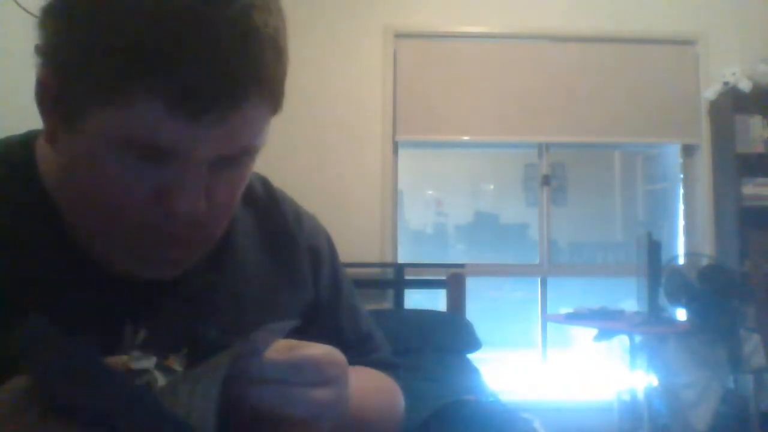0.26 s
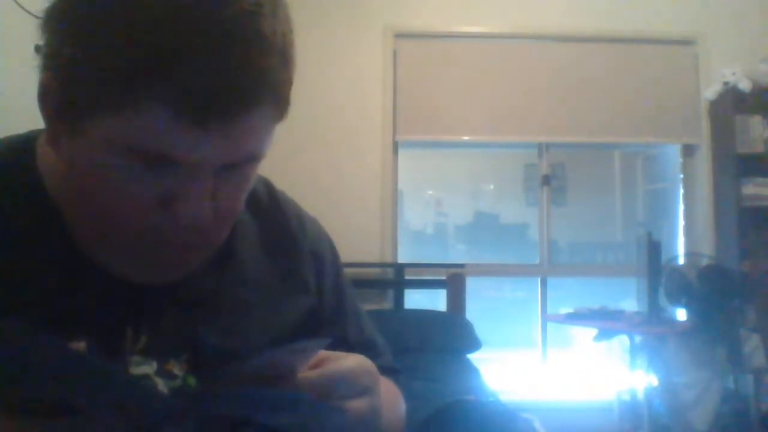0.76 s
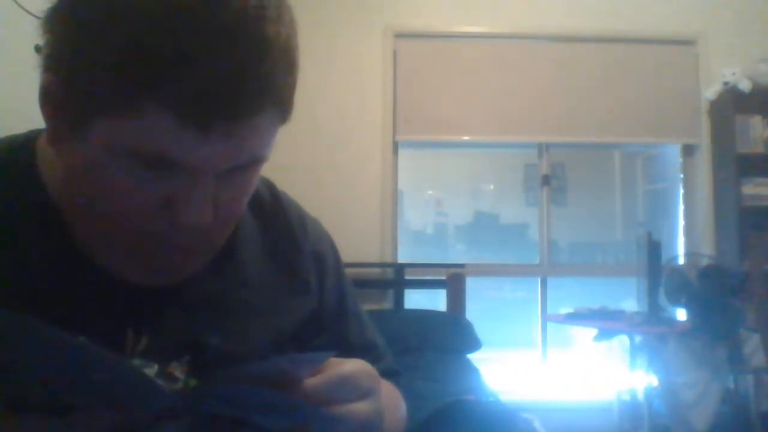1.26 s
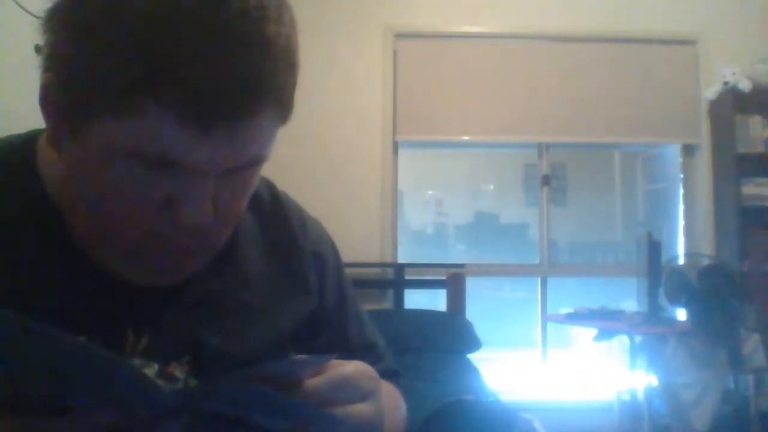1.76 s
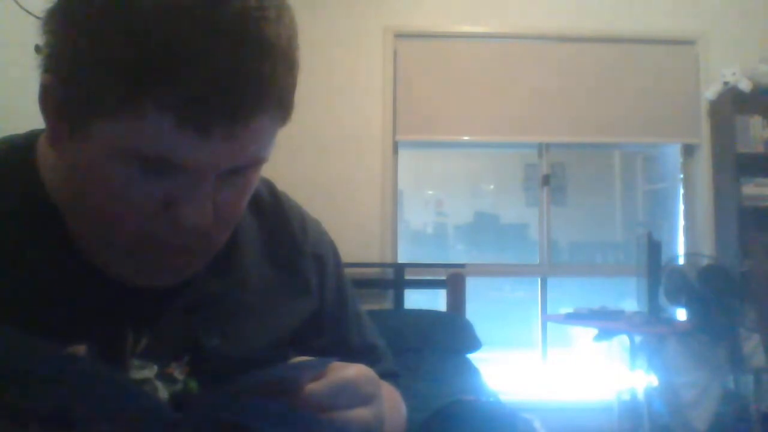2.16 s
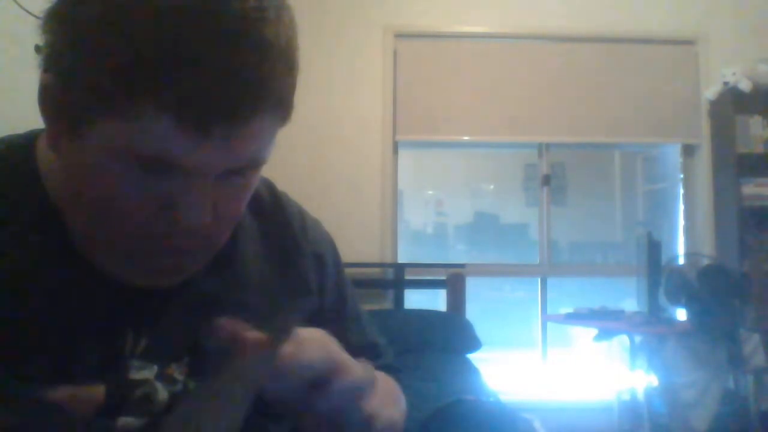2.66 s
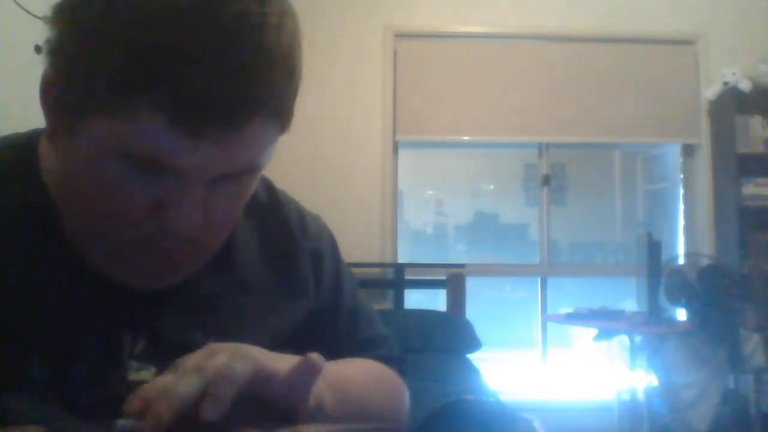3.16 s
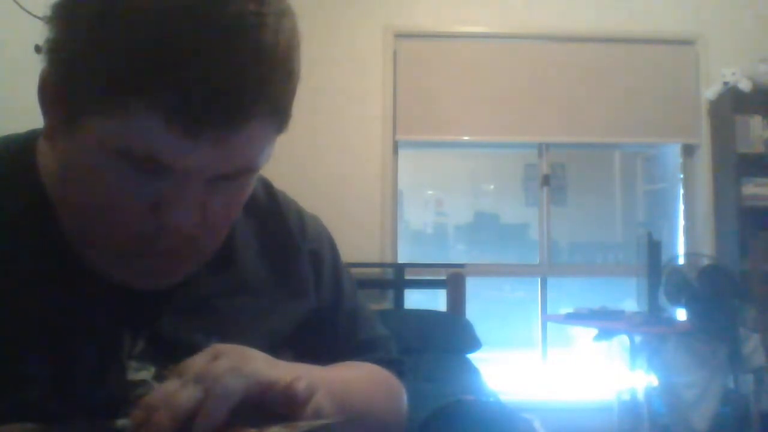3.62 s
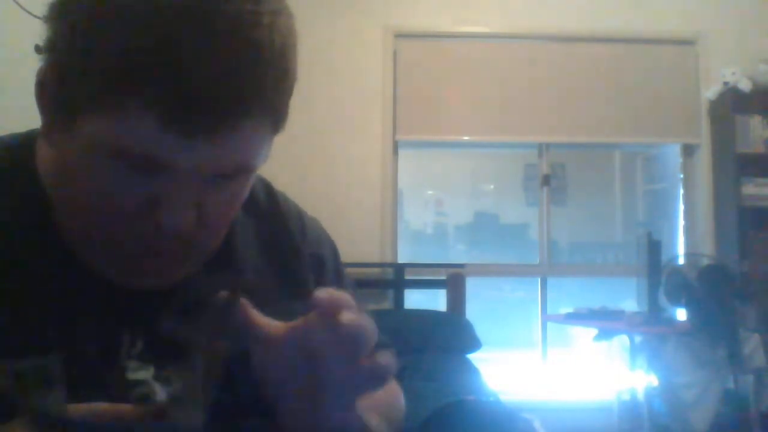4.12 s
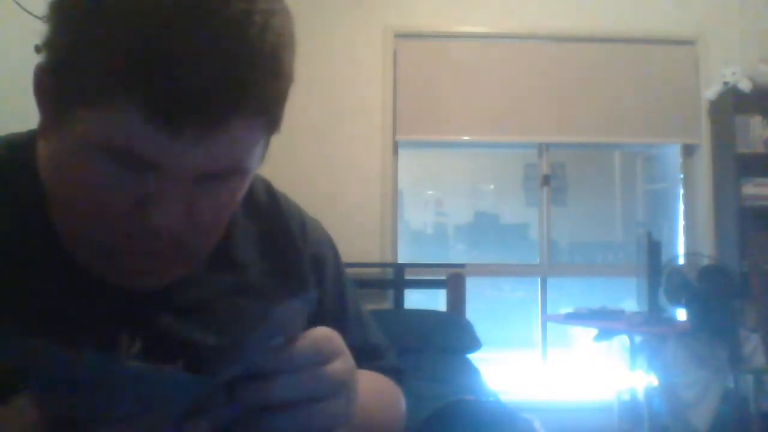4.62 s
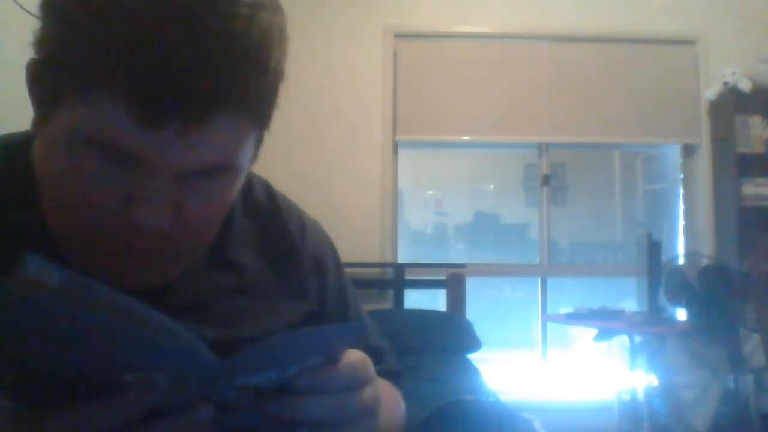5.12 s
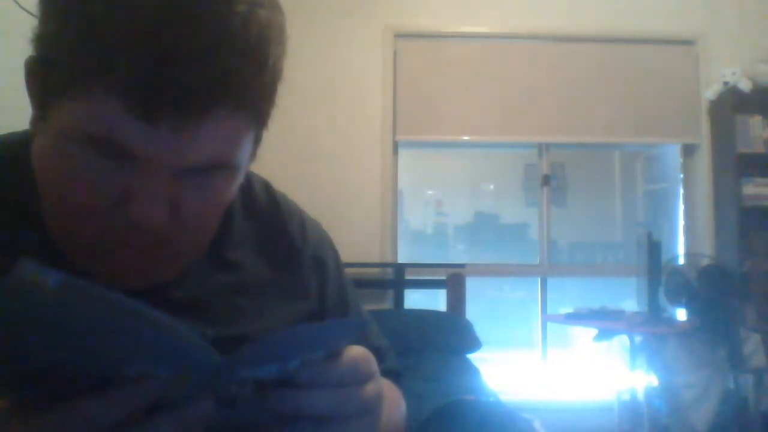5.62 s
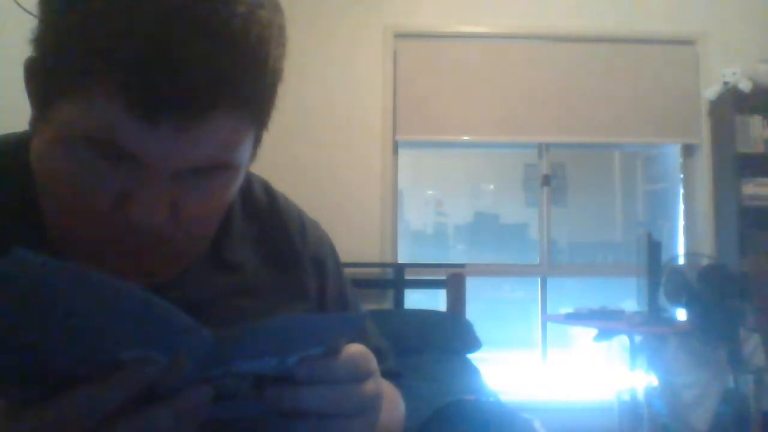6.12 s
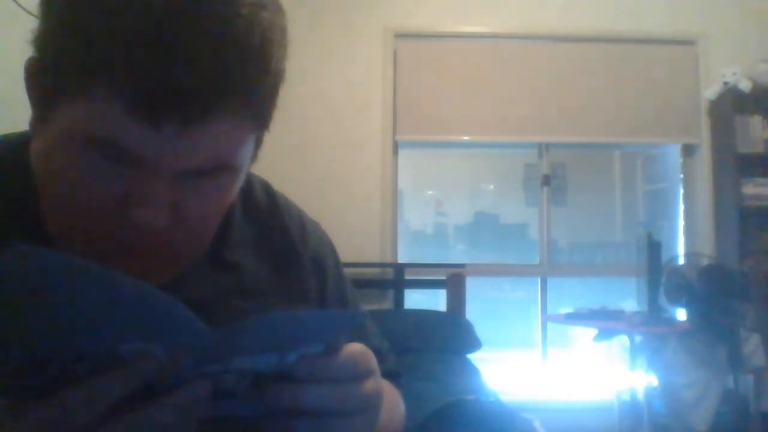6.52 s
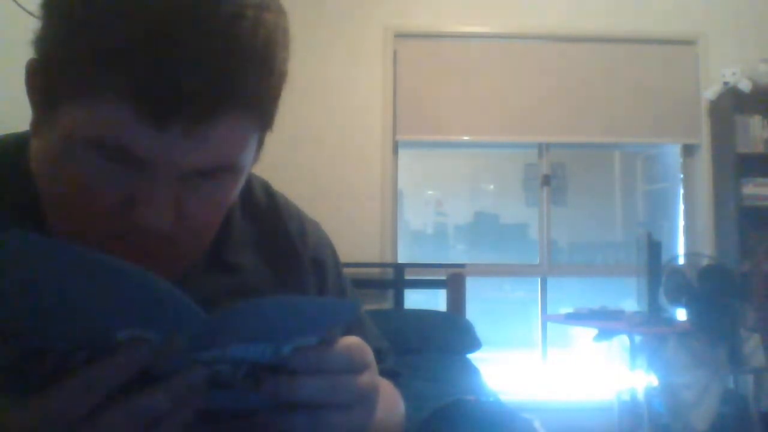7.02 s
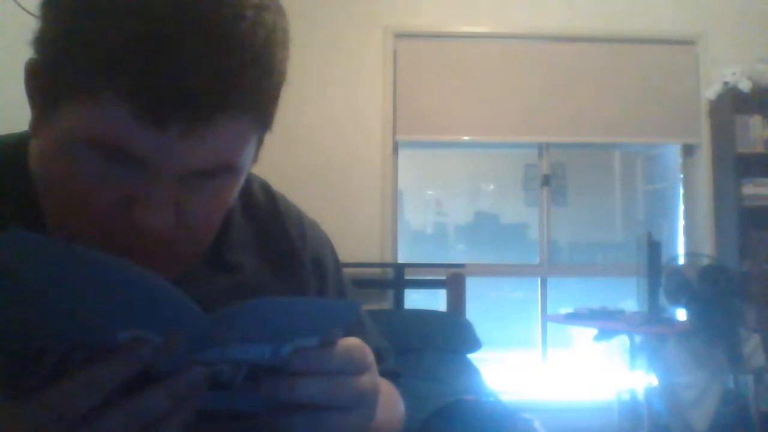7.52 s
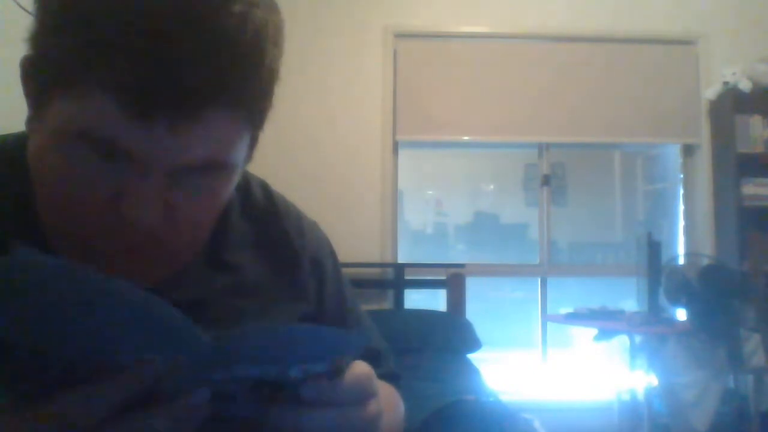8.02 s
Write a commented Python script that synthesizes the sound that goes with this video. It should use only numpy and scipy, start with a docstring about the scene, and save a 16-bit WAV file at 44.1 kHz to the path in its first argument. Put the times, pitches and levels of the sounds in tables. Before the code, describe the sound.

A small cooling fan hums right at the microphone in a quiet room, with a soft rush of air and a fast, fine rattle from its worn bearing. It stumbles briefly now and then. Under it a low tone throbs evenly, and electronics whine faintly very high up. Paper is handled softly, mostly around the middle, with a few dull bumps. A far engine drones faintly through the walls.

```python
"""A small cooling fan with a worn bearing, close to the microphone in a quiet room. It hums on the
harmonics of its turning, rushes through its duct, ticks once a turn and stumbles now and then.
Under it two low machine tones beat into a slow throb; the electronics whine and buzz very high up.
Paper is handled softly, with a few dull bumps. Far off outside, an engine drones through the walls
and changes speed."""
import sys
import numpy as np
from scipy import signal
from scipy.fft import rfft, irfft
from scipy.io import wavfile
from scipy.ndimage import map_coordinates

SR = 44100
rng = np.random.default_rng(int(sys.argv[2]) if len(sys.argv) > 2 else 0)


def dump(signal):
    """Clip the signal to [-1, 1] and save it as 16-bit WAV at the path in sys.argv[1]."""
    limited = np.clip(np.atleast_2d(signal).T, -1, 1)
    pcm = np.round(limited * 32767).astype(np.int16)
    wavfile.write(sys.argv[1], SR, pcm)


N = 365148
T = np.arange(N) / SR

# the fan at the microphone: (time [s], speed [turns/s])
FAN_SPEED = [(0, 59.48), (1.1, 59.75), (2.5, 59.58), (3.2, 59.73), (4.9, 59.47), (5.7, 59.69), (6.4, 59.55),
             (8.28, 59.75)]
# its hum, and the bearing's thin overtones: (harmonic [multiple of turn rate], relative level [dB])
FAN_HARMONICS = [(1, -9), (2, -18.5), (3, -23.5), (4, -18.5), (5, -17.5), (6, 0), (7, -12.5), (8, -14),
                 (9, -11), (10, -20), (11, -32), (12, -15), (13, -17.5), (14, -20.5), (15, -16), (16, -18),
                 (17, -28), (18, -23.5), (19, -26), (20, -28.5)]
BEARING_HARMONICS = [(32, -23.5), (35, -27.5), (38, -27.5), (43, -28)]
# the rotor stumbles: (time [s], half length [s], depth [0-1])
STUMBLES = [(0.666, 0.04, 0.7), (1.148, 0.049, 0.65), (1.95, 0.085, 0.47), (2.753, 0.045, 0.77),
            (3.524, 0.042, 0.77), (4.947, 0.053, 0.68), (5.603, 0.057, 0.8), (7.005, 0.06, 0.72)]
# the bearing settles or rattles hard: (start [s], end [s], looseness [0 calm, 1 its usual rattle])
BEARING_SPELLS = [(.09, .25, .4), (0.717, 1.018, 0.16), (1.022, 1.66, 0.63), (1.66, 1.9, 2),
                  (2.07, 2.57, .15), (2.567, 2.83, 2.1), (3.62, 3.84, 0.16), (4.14, 4.8, 1.4),
                  (5.02, 5.39, .15), (6.33, 6.68, .45), (7.1, 7.337, 0.24), (7.434, 7.577, 0.55),
                  (7.96, 8.2, 1.8)]
# spectrum of one bearing tick: (frequency [Hz], gain [dB])
TICK_SPECTRUM = [(500, -8), (720, -24), (880, -5), (1150, -12), (1720, -6), (1930, 3), (2550, 3.5),
                 (3100, -2), (3570, -13.5), (3750, -24.5), (4150, -3), (4550, -24), (7000, -31.5)]
# its echoes inside the case: (delay [s], gain [dB])
CASE_ECHOES = [(.00313, -4), (.0042, -10), (.00626, -10)]
# rush of air and microphone hiss: (frequency [Hz], level [dB per Hz])
AIR_SPECTRUM = [(8, -102), (20, -82), (140, -81), (230, -85), (505, -90.5), (700, -84), (1080, -84),
                (1750, -91.5), (2200, -91.5), (3400, -94.5), (4500, -110), (10300, -110), (13300, -105),
                (15500, -109)]
# resonances of the air duct: (frequency [Hz], width [Hz], level [dB per Hz])
DUCT_RESONANCES = [(362.6, 51, -73), (447, 35, -79.5), (580.4, 66, -79), (875, 113, -78),
                   (1409, 150, -84.5), (2573, 74, -88)]
# two steady machine tones in the room: (frequency [Hz]) and (level [dB rms])
THROB_HZ = [86.671, 90.132]
THROB_DB = [-47.5, -48]
# spectrum of one burst of the screen's buzz: (frequency [Hz], gain [dB])
BUZZ_SPECTRUM = [(9500, -50), (11100, -10), (11500, -12.5), (11800, -6), (12300, -25), (12950, -6),
                 (13250, -7), (13500, 5), (13950, -6), (14250, -14), (15000, -28), (15500, -35)]
# coil whistles: (frequency [Hz]) and (level [dB rms])
WHINE_HZ = [4848, 7600, 11152, 12608.5, 12848, 14305]
WHINE_DB = [-88.5, -99, -73, -71.5, -71.5, -83]
# paper crinkles: (time [s], peak level before the cut [dB rms], decay [s], cut of the body [dB])
CRINKLES = [(.648, -54, 0.014, 3), (2.53, -52, .024, 10), (2.709, -61, .015, 9), (3.065, -54, .028, 12),
            (3.874, -55.5, .01, 3), (3.91, -61, .022, 2), (4.316, -48, .009, 5), (4.36, -60, .025, 8),
            (4.569, -59, .008, 11), (4.68, -58.5, .008, 7), (4.8, -59.5, 0.034, 5)]
# spectrum of the paper: (frequency [Hz], gain [dB])
PAPER_SPECTRUM = [(800, -10), (2800, 10), (6000, 3), (12000, -3), (16000, 0)]
# dull bumps in the room: (time [s], peak level [dB rms])
BUMPS = [(.84, -52), (2.14, -50), (2.75, -52), (3.2, -59), (3.53, -51), (4.96, -46.5), (6.25, -48.5),
         (7.28, -53), (7.62, -52)]
# the far engine outside: (start [s], end [s], start pitch [Hz], end pitch [Hz], level [dB rms])
ENGINE_SWELLS = [(-.1, .33, 62.3, 65.2, -46), (.5, .85, 75, 78, -61), (2.45, 3.0, 78, 77, -60),
                 (3.6, 4.29, 44.3, 46.7, -47), (4.52, 4.72, 52, 57, -51), (4.92, 5.08, 75, 81, -60)]


def fan_hum(turns, stumble, looseness, hum_db=-42.0, shake_turns=0.014, waver_turns=0.0019, waver_db=0.1):
    """Close up, harmonics of the turn rate. A stumble shakes them all and chops all but the lowest two."""
    shaken = turns + (shake_turns * stumble + waver_turns * looseness) * drift(60)
    harmonics = [tone(round(k) * shaken + rng.random(), db)
                 for k, db in list(FAN_HARMONICS) + list(BEARING_HARMONICS)]
    chop = 1 - stumble * (1.03 + 0.49 * np.cos(np.pi * turns + drift(15)))   # on every other turn
    waver = from_db(waver_db * looseness * drift(30))
    return from_db(hum_db) * (sum(harmonics[:2]) + sum(harmonics[2:]) * chop * waver)


def fan_flutter(turns, stumble, whirl_db=-40, growl_db=-48, whirl_hz=385, rise_hz=120):
    """The stumbling rotor whirls at half speed: a rising chirp every other turn, in a broader growl."""
    lap = (turns / 2) % 1
    cycles = np.cumsum(whirl_hz + rise_hz * (lap - .5)) / SR + 0.12 * drift(35)
    whirl = np.sin(np.pi * lap) * tone(cycles, whirl_db)
    growl = from_db(growl_db) * rms_one(resonant_noise(hz=398, width_hz=245))
    return stumble * (whirl + growl)


def bearing_looseness(settle_s=0.028):
    """Play in the worn bearing: 1, except in the spells where it calms down or rattles hard."""
    change = sum((looseness - 1) * spell(start, end, settle_s) for start, end, looseness in BEARING_SPELLS)
    return np.maximum(1 + change, 0)


def bearing_ticks(turns, looseness, tick_db=-25.5, jitter_s=.00007, scrape_db=-17, scrape_s=0.0012):
    """One contact a turn echoes in the case and scrapes on briefly; a loose bearing makes it limp."""
    contact_turns = np.arange(int(turns[-1])) + .245
    times = np.interp(contact_turns, turns, T)
    force = from_db(contact_db(np.interp(times, T, looseness)))
    times = times + jitter_s * rng.standard_normal(len(times))
    echoes = sum(clicks(times + delay, force * from_db(db)) for delay, db in CASE_ECHOES)
    knocks = clicks(times, force) + echoes
    tails = signal.lfilter([1], [1, -np.exp(-1 / (scrape_s * SR))], knocks + 1e-18)
    scrape = from_db(scrape_db) * tails * rng.standard_normal(N)
    ticks = from_db(tick_db) * colour(knocks + scrape, TICK_SPECTRUM)
    return ticks + bearing_squeaks(times, np.minimum(force, 1.15))


def contact_db(looseness, hard_db=6, spread_db=2.2, hardest_db=7, rebound=2.1, scatter_db=3.9):
    """Each contact against an ordinary tick. A hard knock throws the shaft clear, so the next is weak."""
    count = len(looseness)
    gaps = np.where(rng.random(count) < .5, 3, 2)   # a hard knock every second or third turn
    hard = np.isin(np.arange(count), np.cumsum(gaps) - gaps[0])
    knock_chance, tick_chance = rng.standard_normal((count, 2)).T
    knock_db = hard * np.clip(looseness * (hard_db + spread_db * knock_chance), 0, hardest_db)
    previous_knock_db = np.append(0, knock_db[:-1])
    return knock_db - rebound * previous_knock_db + scatter_db * tick_chance * ~hard


def bearing_squeaks(times, force, squeak_db=-53.0, ring_s=0.0016, pitch_hz=3400, spread_hz=130, fall_hz=110):
    """Each contact squeaks for a few milliseconds at a new pitch, sinking as the shaft lets go."""
    age = np.arange(800) / SR
    swell = (age / ring_s) ** 2 * np.exp(2 - 2 * age / ring_s)
    start_hz = pitch_hz + spread_hz * rng.uniform(-2.24, 1.72, (len(times), 1))
    hz = start_hz - fall_hz * age / ring_s
    squeaks = force[:, None] * swell * tone(np.cumsum(hz, axis=1) / SR, squeak_db)
    at = (times * SR).astype(int)[:, None] + np.arange(len(age))
    return np.bincount(at.ravel(), squeaks.ravel(), N)[:N]


def air_rush():
    """The fan's smooth rush, raised at the resonances of its duct, with microphone hiss on top."""
    duct = sum(from_db(db) * resonant_noise(hz, width) for hz, width, db in DUCT_RESONANCES)
    return np.sqrt(SR / 2) * (colour(rng.standard_normal(N), AIR_SPECTRUM) + duct)


def machine_throb(crest_s=.066):
    """In the room, two low tones close in pitch swell and cancel three and a half times a second."""
    return sum(tone(hz * (T - crest_s), db) for hz, db in zip(THROB_HZ, THROB_DB))


def electronics(refresh_hz=59.763, first_s=.0136, buzz_db=-24.0, waver_db=1.5, jitter_s=.0000025):
    """A short bright burst at each screen refresh, and thin coil whistles that pulse in step."""
    times = np.arange(first_s, T[-1], 1 / refresh_hz)
    times = times + jitter_s * rng.standard_normal(len(times))
    buzz = from_db(buzz_db) * colour(clicks(times, np.ones(len(times))), BUZZ_SPECTRUM)
    whine = sum(tone(hz * T + rng.random(), db + waver_db * drift(80)) for hz, db in zip(WHINE_HZ, WHINE_DB))
    pulse = 1 + 0.09 * np.cos(2 * np.pi * refresh_hz * (T - first_s))
    return buzz + whine * pulse


def paper(grain_db=2.5, rise_share=0.39, crisp_hz=9500):
    """Paper handled softly: grainy bursts swell quickly and die away; crisp ones lose their body."""
    rough_noise = rng.standard_normal(N) * from_db(grain_db * drift(400))
    grains = rms_one(colour(rough_noise, PAPER_SPECTRUM))
    body = signal.sosfilt(signal.butter(3, crisp_hz, "low", fs=SR, output="sos"), grains)
    top = signal.sosfilt(signal.butter(3, crisp_hz, "high", fs=SR, output="sos"), grains)
    crinkles = np.zeros(N)
    for time, db, decay_s, cut_db in CRINKLES:
        from_peak = np.maximum(T - time, (time - T) / rise_share) / decay_s
        envelope = from_db(db) * np.exp(-np.minimum(from_peak, 20))
        crinkles += envelope * (top + from_db(-cut_db) * body)
    return crinkles


def dull_bumps(half_length_s=0.029):
    """Bumps in the room reach the microphone as soft low swells with no attack."""
    envelope = sum(from_db(db) * bell_curve(time, half_length_s) for time, db in BUMPS)
    return envelope * rms_one(resonant_noise(hz=140, width_hz=22))


def far_engine(fade_s=0.14):
    """Far off outside: only the firing tone gets through the walls, gliding with the engine's speed."""
    drone = np.zeros(N)
    for start, end, start_hz, end_hz, db in ENGINE_SWELLS:
        firing_hz = np.interp(T, [start, end], [start_hz, end_hz])
        drone += spell(start, end, fade_s) * tone(np.cumsum(firing_hz) / SR, db)
    return drone


def from_db(db):
    """Decibels to gain."""
    return 10 ** (np.asarray(db) / 20)


def rms_one(x):
    """Scale to rms 1."""
    return x / np.sqrt(np.mean(x ** 2) + 1e-20)


def tone(cycles, db):
    """A sine of the given rms level."""
    return np.sqrt(2) * from_db(db) * np.sin(2 * np.pi * cycles)


def spell(start, end, fade_s):
    """1 between start and end, with ramps centred on both."""
    return np.clip(.5 + np.minimum(T - start, end - T) / fade_s, 0, 1)


def bell_curve(time, half_length_s):
    """A smooth rise and fall that reaches 1 at the given time."""
    return np.exp(-np.minimum(((T - time) / half_length_s) ** 2, 20))


def drift(rate):
    """A smooth random curve of rms 1 that changes about rate times a second."""
    knots = rng.standard_normal(4096)
    return rms_one(map_coordinates(knots, [T * rate], order=3, mode="wrap"))


def colour(x, points, size=2 ** 14):
    """Causal (minimum-phase) filter through the points (frequency [Hz], gain [dB])."""
    hz, db = np.transpose(points)
    grid_hz = np.maximum(np.arange(size // 2 + 1) * SR / size, 1)
    gain = from_db(np.interp(np.log(grid_hz), np.log(hz), db))
    cepstrum = irfft(np.log(gain))
    cepstrum[1:size // 2] *= 2
    cepstrum[size // 2 + 1:] = 0
    return signal.fftconvolve(x, irfft(np.exp(rfft(cepstrum))))[:N]


def resonant_noise(hz, width_hz):
    """Unit white noise through a steep resonance with gain 1 on top."""
    edges = [max(hz - width_hz / 2, 10), hz + width_hz / 2]
    band = signal.butter(2, edges, "band", fs=SR, output="sos")
    return signal.sosfilt(band, rng.standard_normal(N + SR))[SR:]


def clicks(times, sizes):
    """Band-limited clicks, placed between samples."""
    taps = np.arange(-16, 17)
    at = np.round(times * SR).astype(int)[:, None] + taps
    shapes = np.sinc(at - times[:, None] * SR) * np.hanning(len(taps)) * sizes[:, None]
    inside = (at >= 0) & (at < N)
    return np.bincount(at[inside], shapes[inside], N)


def scene():
    """The fan up close, its turning driving hum and ticks; the room and the far engine lie under it."""
    speed = np.interp(T, *np.transpose(FAN_SPEED))
    turns = np.cumsum(speed) / SR
    looseness = bearing_looseness()
    stumble = np.clip(sum(depth * bell_curve(time, half_s) for time, half_s, depth in STUMBLES), 0, 1)
    rotor = fan_hum(turns, stumble, looseness) + fan_flutter(turns, stumble)
    fan = rotor + bearing_ticks(turns, looseness) + air_rush()
    room = machine_throb() + electronics() + paper() + dull_bumps()
    return (fan + room + far_engine())[None]


def record(dry, cutoff_hz=15720):
    """One microphone, mono, with the top cut steeply."""
    lowpass = signal.firwin(801, cutoff_hz, fs=SR, window=("kaiser", 9))
    return signal.fftconvolve(dry, lowpass[None], mode="same", axes=1)


dry = scene()
out = record(dry)
dump(out)
```